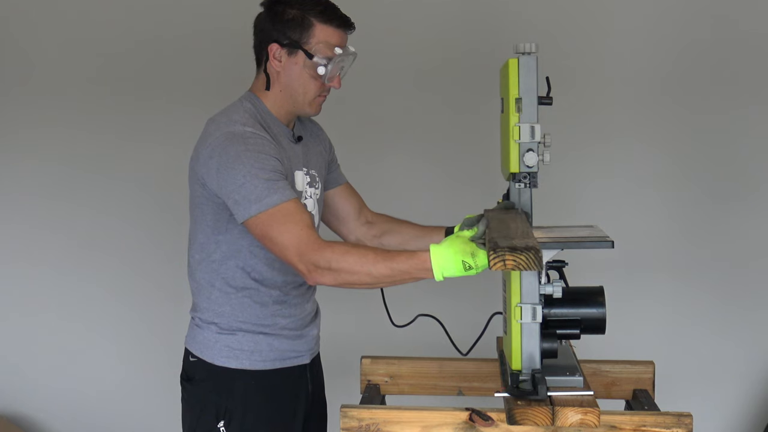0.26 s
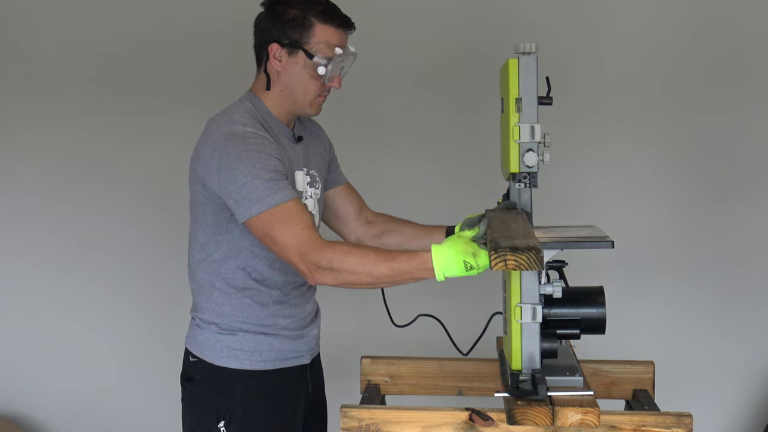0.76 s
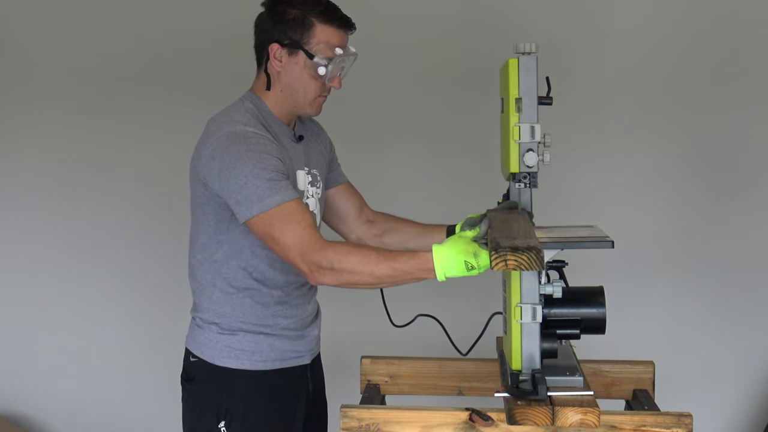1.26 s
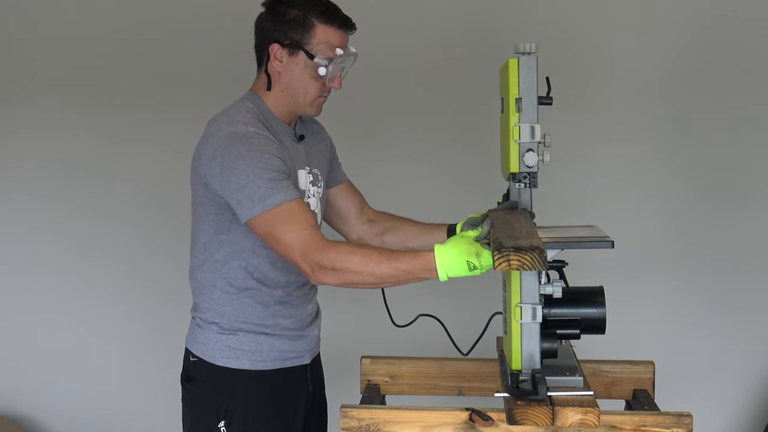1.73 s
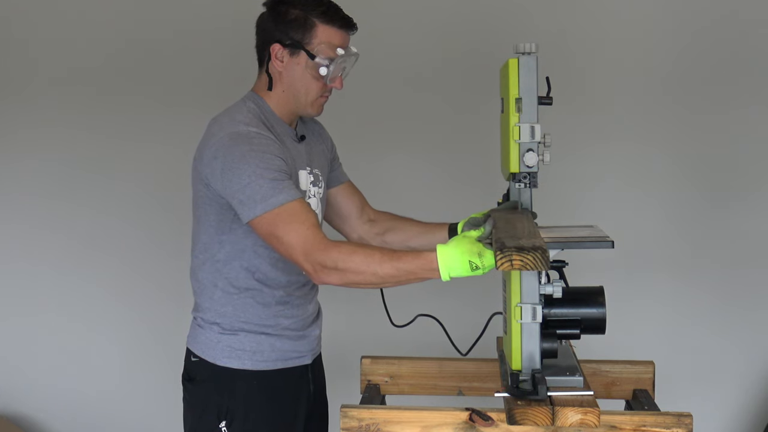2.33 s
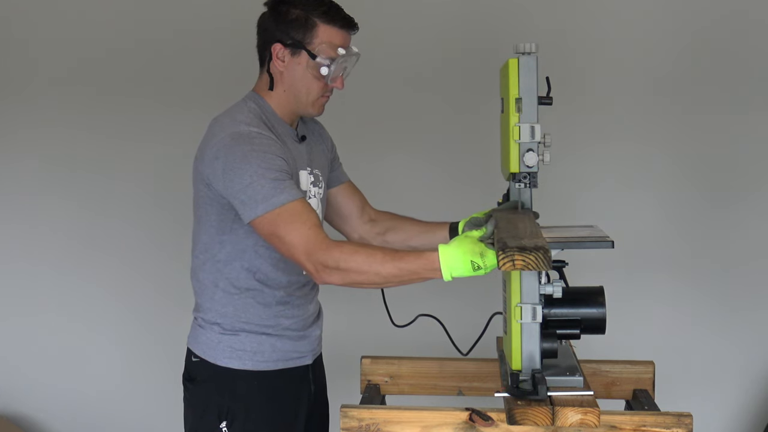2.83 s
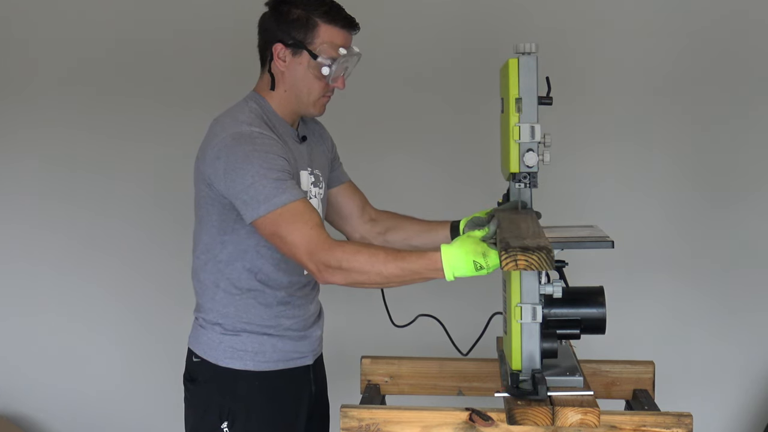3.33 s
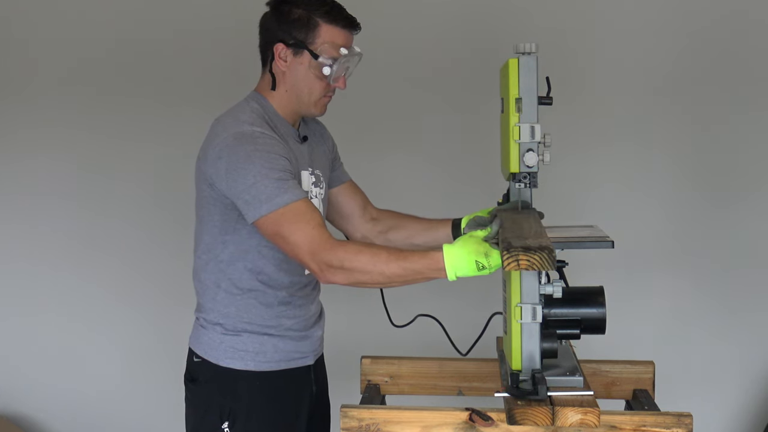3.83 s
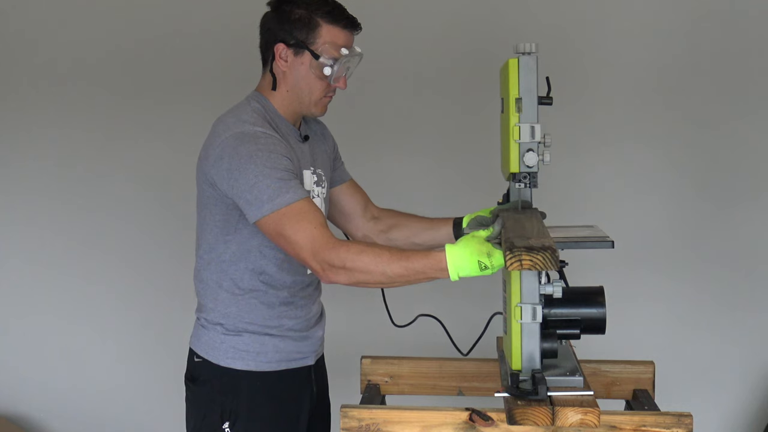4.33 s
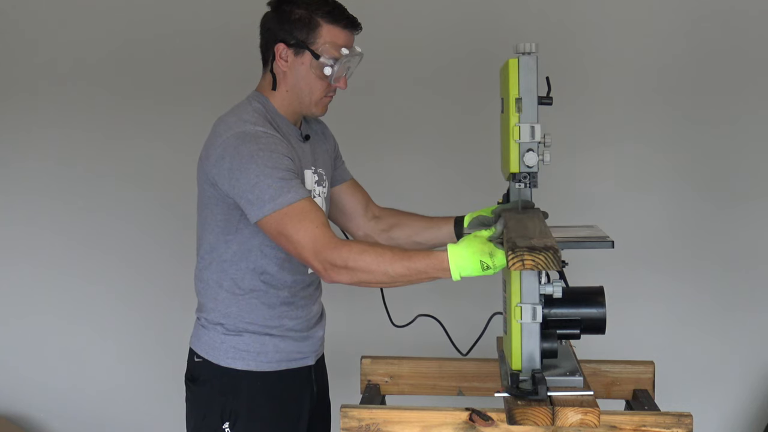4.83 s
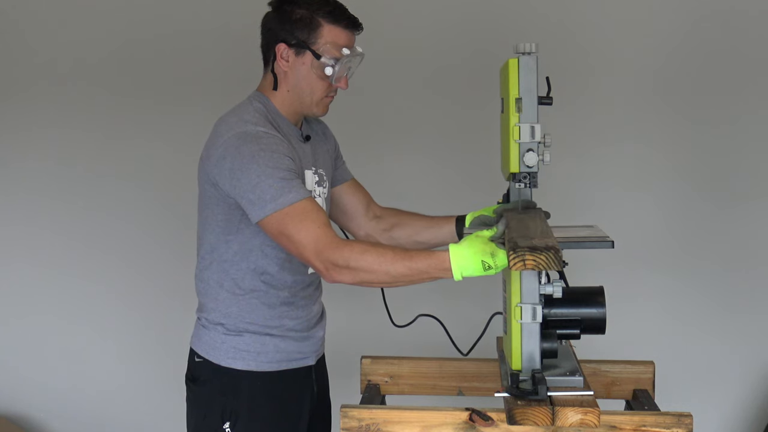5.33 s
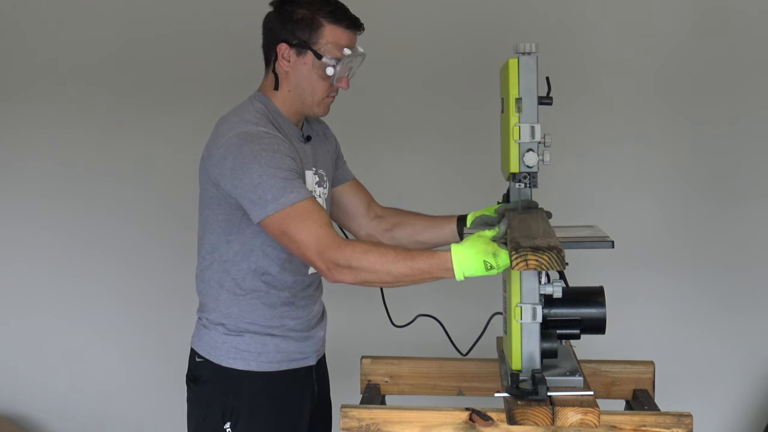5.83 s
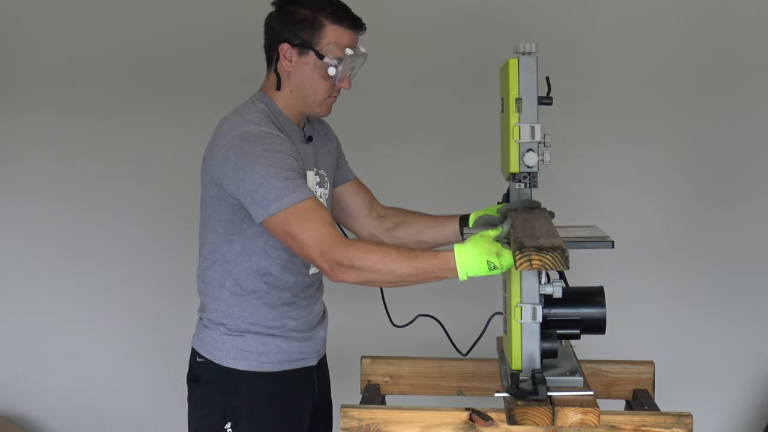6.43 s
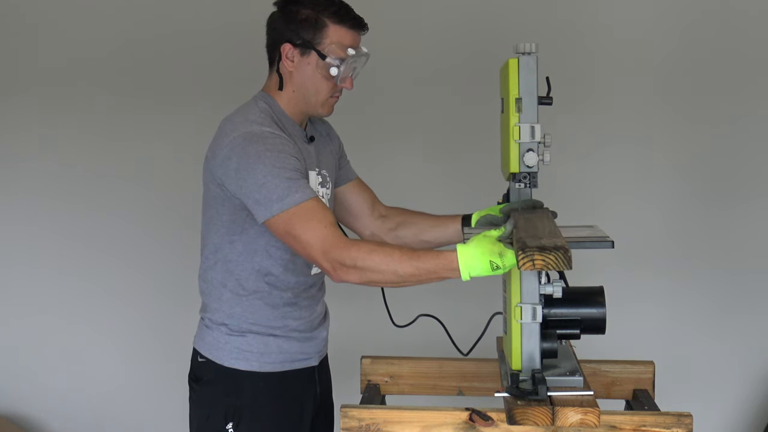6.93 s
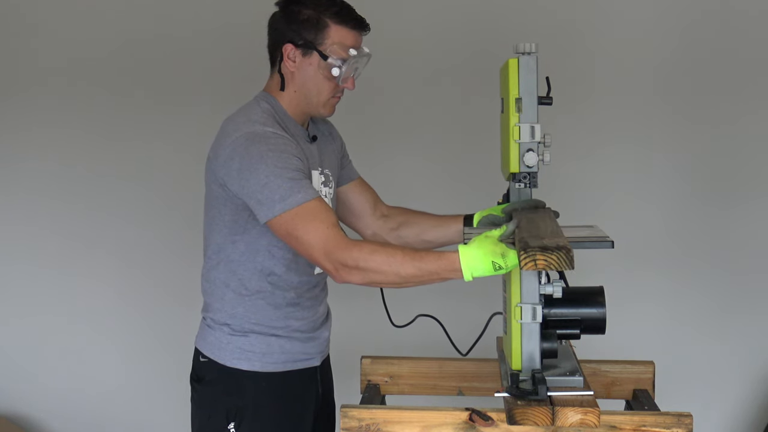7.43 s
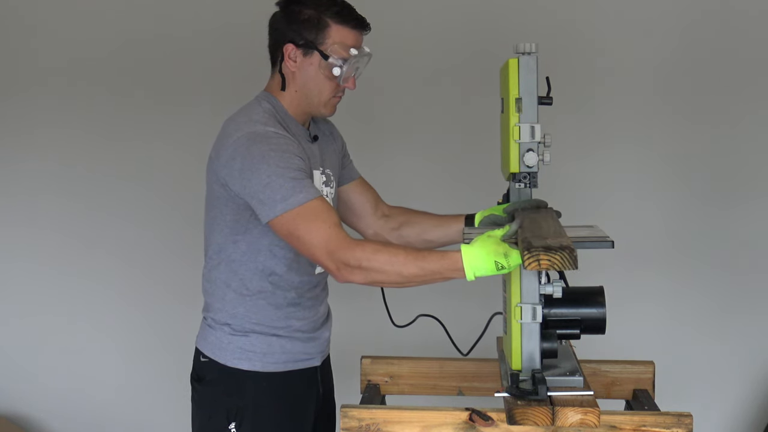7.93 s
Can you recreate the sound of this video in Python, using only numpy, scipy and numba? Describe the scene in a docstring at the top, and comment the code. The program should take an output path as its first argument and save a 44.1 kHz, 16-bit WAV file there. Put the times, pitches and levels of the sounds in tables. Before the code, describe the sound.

Close, harsh band saw noise in a workshop: steady machine hum, fast tooth buzz and grainy wood rasp. Sharp metallic chirps crowd the first two seconds, then thin out as the cut calms. A thin whistle and faint bearing whine sit on top. Later, woody honking resonances flutter with the wheel. The saw is still cutting at the end; the small chest microphone hears a slight room reflection.

```python
"""A small band saw cuts a board in a workshop, heard by one microphone on the worker's chest.
Tooth sets strike the wood about 960 times a second; strikes and fibre noise drive the rasp and the ringing
board, blade, guides and table, each louder or softer as the feed and the free blade length change.
Wheels and frame hum at multiples of the wheel speed. Short squeals, a tooth whistle and a thin bearing
whine lie on top, and a short room tail follows the blade."""
import sys
import numpy as np
from scipy import signal
from scipy.fft import rfft, irfft, next_fast_len
from scipy.io import wavfile
from scipy.ndimage import uniform_filter1d
from numba import njit

SR = 44100
rng = np.random.default_rng(int(sys.argv[2]) if len(sys.argv) > 2 else 0)


def volts_from_db(level):
    """Convert decibel levels to linear amplitude ratios."""
    exponent = np.asarray(level, float) / 20
    return 10 ** exponent


def log_audio(samples):
    """Write samples as a 16-bit WAV file to the path given in sys.argv[1]."""
    # one column per channel
    frames = np.atleast_2d(samples).T
    # limit to full scale, then quantise
    limited = np.clip(frames, -1, 1)
    pcm = np.round(limited * 32767).astype(np.int16)
    wavfile.write(sys.argv[1], SR, pcm)


N = 360297
TIME = np.arange(N) / SR


def unit(x):
    """Scale to rms 1."""
    return x / np.sqrt(np.mean(x ** 2))


def curves(table):
    """Columns of a table after its first, start_s, drawn as straight lines with one value a sample."""
    start_s, *columns = np.transpose(table)
    return [np.interp(TIME, start_s, column) for column in columns]


def walk(rate_hz):
    """Random levels held 1 / rate_hz seconds and slewed twice; rms 1."""
    hold = int(SR * 1 / rate_hz)
    steps = np.repeat(rng.standard_normal(N // hold + 1), hold)
    return unit(uniform_filter1d(uniform_filter1d(steps, hold), hold)[:N])


def ring(x, modes):
    """Sum of resonances, each a peak filter applied twice for steeper sides."""
    out = 0
    for pitch_hz, width_hz, level_db in modes:
        peak = np.concatenate(signal.iirpeak(pitch_hz, pitch_hz / width_hz, SR))
        out = out + volts_from_db(level_db) * signal.sosfilt([peak, peak], x)
    return out


def colour(x, spectrum):
    """Shape x by a spectrum of (pitch_hz, level_db) points, joined along log frequency."""
    pitch_hz, level_db = np.transpose(spectrum)
    size = next_fast_len(N)
    bins_hz = np.fft.rfftfreq(size, 1 / SR) + 1  # the 1 keeps the logarithm finite
    gain = volts_from_db(np.interp(np.log(bins_hz), np.log(pitch_hz), level_db))
    return irfft(rfft(x, size) * gain, size)[:N]


@njit
def sliding(x, pitch_hz, width_hz):
    """State-variable band-pass whose centre moves, gain 1 at the centre."""
    y, band, low = np.empty(len(x)), 0., 0.
    for i in range(len(x)):
        g, k = np.tan(np.pi * pitch_hz[i] / SR), width_hz / pitch_hz[i]
        v = (band + g * (x[i] - low)) / (1 + g * (g + k))
        band, low, y[i] = 2 * v - band, low + 2 * g * v, k * v
    return y


LOOP_SETS = 119  # tooth sets around the blade


def strikes(sets, jitter=0.048, wear_db=4.5, scatter_db=2.0):
    """One click a tooth set; worn teeth come round each blade loop, the grain adds chance."""
    k = np.arange(1, int(sets[-1]))
    worn = rng.standard_normal((LOOP_SETS, 2))[k % LOOP_SETS]
    grain = rng.standard_normal((N // 40, 2))[k]
    # jitter is in tooth-set spacings
    at = np.interp(k + jitter * (worn[:, 0] + grain[:, 0]), sets, np.arange(N))
    # a windowed sinc places each click between samples
    place = at.astype(int) + np.arange(-7, 9)[:, None]
    click = np.sinc(place - at) * np.cos(np.pi * (place - at) / 16) ** 2
    size = volts_from_db(wear_db * worn[:, 1] + scatter_db * grain[:, 1])
    clicks = np.bincount(np.clip(place, 0, N - 1).ravel(), (click * size).ravel(), N)
    return unit(clicks - uniform_filter1d(clicks, 200))  # takes the slow drift out


# Shared level of the rasp and most ringing parts, sinking as the feed eases and rising with each
# new push: start_s, level_db
CUT_LEVEL = [(0, 10.5), (.1, 2.5), (.16, 6.5), (.5, 1), (.6, 4.5), (1.1, 3), (1.46, 0), (1.5, 4), (1.7, 3),
             (1.76, 0.5), (2.2, 1), (2.4, 0), (3.05, -0.5), (3.3, -1), (4.2, -3), (4.3, -1), (4.45, 2),
             (4.75, -0.5), (5.2, 1.5), (5.8, -1.5), (6.9, -1), (7.2, -3), (7.7, -.5), (8.17, -2)]
# How freely each part rings, added to the shared level: start_s, level_db
BOARD_RING = [(0, -7), (.2, 1), (2.5, -1), (3.6, 1.5), (4.2, -3.5), (5.6, -2.5), (6.1, 2), (6.3, 4.5),
              (6.48, 5), (6.6, 1.5), (6.75, 1.5), (6.85, 4.5), (7.08, 4.5), (7.25, 4), (8.17, -2)]
BOARD_UPPER_RING = [(0, -2.5), (2.5, -1.5), (3.5, -4), (5.4, -4), (5.8, 7), (6.15, 11), (6.4, 5), (6.55, 1),
                    (7.1, 9), (7.6, 1), (8.17, 0)]
BLADE_LOW_RING = [(0, 1.5), (.6, 3), (1.2, -1), (1.7, 2.5), (2.4, 3), (3.4, 3.5), (4.3, 0.5), (5, -1),
                  (5.8, -0.5), (8.17, 1.5)]
BLADE_HIGH_RING = [(0, -2), (.2, 2), (.45, 2.5), (.6, 11), (.85, 9.5), (.9, 4), (.95, 10.5), (1.06, 7.5),
                   (1.12, 2), (1.45, -0.5), (1.9, 0), (2.15, 7), (2.55, -2), (3.1, 2), (4.4, -2.5),
                   (5.4, 2), (5.9, -3), (8.17, -10)]
BLADE_FLANKS_RING = [(0, 7), (.5, -2), (.6, 7), (1.05, 7), (1.4, 2), (2.15, 5), (2.6, -2), (4.2, -6),
                     (5.5, 2), (6.3, 1.5), (7.1, 1), (7.6, -0.5), (8.17, -6)]
GUIDE_RING = [(0, -7), (.9, -8), (1.08, 7), (1.4, -6), (2.3, 0), (3.4, -1.5), (4.1, 0), (4.3, 3.5),
              (4.9, -0.5), (5.3, 2.5), (5.9, -0.5), (6.6, 0.5), (7.2, -2), (7.55, 2.5), (7.75, 2),
              (7.9, -5), (8.17, 2)]
WHISPER_RING = [(0, -10), (2, 1), (4, 1), (4.3, 5), (4.9, 8), (5.2, 6), (5.6, 1), (7.4, 1), (7.75, 4),
                (8.17, -1)]
FIZZ_RING = [(0, 11), (.1, 4), (.17, 16.5), (.3, 6.5), (.9, 0), (1.25, -10), (1.45, -8), (1.5, 7),
             (1.72, 8.5), (1.78, 0), (4.2, -4), (4.4, 0), (8.17, -13)]


def levels():
    """Levels in dB of the rasp and most ringing parts: a shared curve plus each part's own ringing or drift."""
    shared = curves(CUT_LEVEL)[0]
    table_fade_db = 1.46 * TIME  # the table fades as the cut deepens
    table_entry_db = 4 * np.exp(-TIME / 0.53)  # and is loud while the blade enters
    return dict(rasp=shared - 42 + 0.2 * TIME,  # rises 0.2 dB a second against the shared level
                board=shared - 45 + curves(BOARD_RING)[0],
                upper=shared - 53 + curves(BOARD_UPPER_RING)[0],
                low=shared - 45.5 + curves(BLADE_LOW_RING)[0],
                high=shared - 48 + curves(BLADE_HIGH_RING)[0],
                flanks=shared - 52.5 + curves(BLADE_FLANKS_RING)[0],
                guide=shared - 48.5 + curves(GUIDE_RING)[0],
                whisper=shared - 70.5 + curves(WHISPER_RING)[0],
                table=shared - 47.5 - table_fade_db + table_entry_db,
                fizz=shared - 65.5 + curves(FIZZ_RING)[0])


MOTOR_THROB_HZ = 56.26
# Tooth rate: start_s, tooth_sets_per_s
TEETH = [(0, 965), (1.5, 962.5), (3, 961), (4, 959.5), (5.5, 959.5), (8.17, 957)]
# Tooth strikes over fibre noise, before each part takes its share: start_s, level_db
EVENNESS = [(0, 1), (2, 3), (4, 2), (5.6, 0), (6, -6), (8.17, -5)]
# Fifth multiple of the tooth rate: start_s, level_db
WHISTLE = [(0, -60), (2.2, -58), (2.8, -52), (3.6, -48.5), (4.1, -53.5), (4.5, -55), (5.5, -60),
           (8.17, -66)]
# Free end of the board: start_s, pitch_hz, level_db
FREE_END = [(0, 855, -46), (3.7, 850, -48), (4.2, 815, -50), (4.4, 763, -43), (5.3, 797, -44.5),
            (5.8, 787, -49), (6.1, 847, -47), (6.4, 810, -44), (6.6, 850, -53), (6.9, 830, -43),
            (7.3, 854, -49.5), (8.17, 836, -45)]
# Relative spectrum of the rasp: pitch_hz, level_db (per Hz)
RASP = [(40, -58), (100, -33.5), (200, -25.5), (320, -15.5), (1000, -14), (1500, -10), (2150, -14),
        (2620, -13), (2800, -15.5), (4300, -14), (5250, -16.5), (6200, -16), (7900, -29.5), (9000, -24.5),
        (12000, -29), (13500, -43), (15600, -42)]
# Resonances, levels relative within each part: pitch_hz, width_hz (of one filter pass), level_db
FRAME = [(490, 60, 0), (1340, 90, -4), (1440, 50, -1), (2310, 90, -3), (3225, 80, -5), (3460, 140, -1),
         (5650, 240, 5), (5810, 220, 3), (6185, 110, -3), (6745, 170, 2), (7330, 200, 1), (10520, 240, -1)]
BOARD = [(740, 35, -9), (770, 45, -13), (806, 35, -10), (848, 40, 0), (875, 38, 1)]
BOARD_UPPER = [(930, 40, -9), (968, 32, 0), (1020, 45, -7)]
BLADE_FLANKS = [(4650, 80, 1), (4975, 105, 2)]
WHISPER = [(14380, 330, 0), (15270, 300, -4)]
BLADE_LOW = [(1620, 150, -8), (1742, 90, -3), (1840, 110, -6), (1922, 62, 1), (1990, 80, -7),
             (2070, 45, -12)]
GUIDE = [(3843, 55, 0), (3900, 100, -5), (3995, 70, -7), (4090, 120, -14)]
TABLE = [(4250, 60, -5), (4325, 70, 0), (4382, 35, 2), (4505, 110, -5)]
BLADE_HIGH = [(4700, 80, -8), (4772, 42, 3), (4820, 55, -2), (4880, 60, -8)]
FIZZ = [(11020, 100, -7), (11320, 200, -9), (11630, 200, 0), (11980, 220, -1)]


def cut(turns, level):
    """Strikes and fibre noise drive each ringing part; wheel, blade loop and motor throb pulse the blade."""
    # the blade stretches and slips, so the tooth rate wavers
    sets = np.cumsum(curves(TEETH)[0] + 1.5 * walk(25)) / SR
    clicks = volts_from_db(curves(EVENNESS)[0]) * strikes(sets)
    wheel_db = 0.83 * np.cos(2 * np.pi * turns + 1.26) + 1.1 * np.cos(4 * np.pi * turns + 1.66)
    loop_db = 0.6 * np.cos(2 * np.pi * sets / LOOP_SETS + 3.14)
    motor_db = 1.4 * np.cos(2 * np.pi * MOTOR_THROB_HZ * TIME)
    chance_db = 0.16 * walk(21.82) + 0.6 * walk(9) + 0.68 * walk(70)
    bite_db = wheel_db + loop_db + motor_db + chance_db

    def part(body, level_db, strike_db, chatter_db, follow):
        """One part, with its share of strikes, its own chatter and how far it follows the bite."""
        force = volts_from_db(strike_db) * clicks + rng.standard_normal(N)
        gain = volts_from_db(follow * bite_db + chatter_db * walk(30))
        return volts_from_db(level_db) * unit(body(unit(gain) * force))

    def ringing(modes, *settings):
        """A part made of fixed resonances."""
        return part(lambda x: ring(x, modes), *settings)

    whistle_db = curves(WHISTLE)[0] + 2.5 * walk(40)
    whistle = np.sqrt(2) * volts_from_db(whistle_db) * np.sin(5 * 2 * np.pi * sets)
    # the loosening board shakes more with each wheel turn
    flutter_db = 0.15 * TIME * np.cos(2 * np.pi * turns + 2.5)
    free_hz, free_db = curves(FREE_END)
    # each row: level_db, strike_db, chatter_db, follow
    rasp = part(lambda x: colour(x + ring(x, FRAME), RASP), level["rasp"], -12.0, 0.66, 0.55)
    board = ringing(BOARD, level["board"] + flutter_db, -12, 0.56, 0.5)
    # the free end of the board rings at a pitch set by where the hands hold it
    free_end = part(lambda x: sliding(x, free_hz, 55.0), free_db + flutter_db, -14.5, 2.3, 0.27)
    board_upper = ringing(BOARD_UPPER, level["upper"], -15, 1.0, 0.6)
    blade_flanks = ringing(BLADE_FLANKS, level["flanks"], -14, 0.61, 1.7)
    whisper = ringing(WHISPER, level["whisper"], -16, 1.8, 0.73)
    blade_low = ringing(BLADE_LOW, level["low"], -12.5, 0.52, 2.0)
    guide = ringing(GUIDE, level["guide"], -18.0, 1.0, 1.0)
    table = ringing(TABLE, level["table"], -27, 1.9, 0.68)
    blade_high = ringing(BLADE_HIGH, level["high"], -6, 0.94, 3.3)
    fizz = ringing(FIZZ, level["fizz"], -11, 1.8, 3.2)
    wood = board + free_end + board_upper
    blade = blade_low + blade_high + blade_flanks
    return whistle + rasp + wood + blade + guide + table + whisper + fizz


# Wheel multiples that the frame sounds, relative levels: multiple, level_db
HUM = [(9, -28), (11, -28), (13, -15), (14, -15), (15, -8), (16, -15), (18, -16), (19, -16), (20, -16),
       (21, 0), (22, -15), (23, -9), (24, -17), (25, -14), (26, -23), (28, -13), (29, -10), (31, -19),
       (37, -16), (39, -18), (43, -13)]
# All the hum together: start_s, level_db
HUM_LEVEL = [(0, -40), (.3, -41.5), (1.4, -41.5), (2.2, -44.5), (3.2, -46), (4.1, -48), (4.4, -45),
             (5.3, -43.5), (5.9, -45.5), (6.4, -46.5), (7.3, -48.5), (7.7, -46), (8.17, -47)]


def hum(turns, waver_db=.9, drift_rad=0.14):
    """Wheel and tyre errors repeat each turn; the frame sounds their multiples, each wavering alone."""
    tones = np.zeros(N)
    for multiple, level_db in HUM:
        # multiples under 17 fade against the rest as the cut deepens, 0.5 dB a second
        fade_db = (multiple < 17) * 0.5 * (TIME - TIME.mean())
        gain = volts_from_db(level_db + waver_db * walk(6.1) - fade_db)
        phase = 2 * np.pi * (multiple * turns + rng.random()) + drift_rad * walk(4.6)
        tones += gain * np.sin(phase)
    return volts_from_db(curves(HUM_LEVEL)[0]) * unit(tones)


# Lesser squeals, peak against the part's level: part, pitch_hz, spread_hz, level_db, length_ms
CHANCE_SQUEALS = [("board", 855, 25, 9, 14), ("low", 1915, 20, 9, 8.1), ("guide", 3880, 45, 9, 9.3),
                  ("table", 4390, 70, 9, 8), ("high", 4790, 67, 10, 5.7), ("rasp", 5700, 80, 2, 7.2),
                  ("rasp", 6720, 41, -5, 7.2)]
# How often each row above comes: squeals_per_s
CHANCE_PER_S = [3, .6, 2, 1.2, 2.5, .8, 1]


def chance_squeals(level):
    """Squeals at random moments, rising and falling with their part's level, most peaking well above it."""
    scatter_db, length_spread = 2.5, 0.48  # length_spread is in natural log units
    rows = []
    for (name, pitch_hz, spread_hz, over_db, ms), per_s in zip(CHANCE_SQUEALS, CHANCE_PER_S):
        count = int(per_s * N / SR)
        at = rng.integers(0, N, count)
        pitch, size, length = rng.standard_normal((count, 3)).T
        peak_db = level[name][at] + over_db + scatter_db * size
        rows += zip(at / SR, peak_db, pitch_hz + spread_hz * pitch, ms * np.exp(length_spread * length))
    return rows


# Squeals at set moments, loud and faint: peak_s, level_db, pitch_hz, length_ms
SQUEALS = [(.01, -30, 3990, 17), (0.058, -25, 4620, 7), (.129, -22.5, 4360, 9.1), (.178, -26, 3910, 6.5),
           (.18, -32, 869, 24), (.26, -26, 4940, 4.5), (.296, -24.5, 4770, 7.3), (.347, -25.5, 4270, 6),
           (.421, -28.5, 4850, 20), (.538, -23, 4830, 5), (.8, -28, 4980, 12), (.853, -27, 4990, 10),
           (2.62, -35, 4330, 14), (2.67, -34, 4350, 12), (2.54, -34, 3850, 12), (.733, -24, 4800, 7),
           (.781, -24, 4780, 8), (.885, -29, 846, 19), (1.298, -29, 4820, 6), (2.025, -29, 5750, 7),
           (4.371, -31, 3930, 6.5), (4.386, -34, 875, 29), (4.67, -29, 3900, 8.4), (5.324, -28, 4740, 6.6),
           (5.437, -29.5, 3870, 15), (6.291, -26, 874, 5), (6.445, -27, 832, 8.8), (7.124, -28, 870, 9),
           (7.848, -29, 868, 6.4), (7.59, -37, 6750, 8), (7.195, -42, 4680, 12), (6.935, -29, 858, 17),
           (3.395, -34, 830, 12), (3.3, -33.5, 850, 45), (2.915, -30, 1925, 12), (0.036, -25.5, 5850, 7.1),
           (0.141, -23, 4830, 5.6), (0.16, -23.5, 1930, 8.6), (0.336, -25.5, 1924, 7),
           (0.357, -25, 849, 26), (0.597, -27, 4780, 6), (0.602, -21.5, 1933, 19.3), (0.624, -21, 4800, 14),
           (0.67, -25, 3900, 11.5), (0.823, -20, 4780, 6.7), (0.951, -19, 4800, 4.5),
           (1.002, -26, 4770, 9.0), (1.041, -19.5, 4900, 4.6), (1.18, -28, 4830, 11),
           (1.315, -23.5, 4840, 9.1), (1.42, -25, 847, 7.1), (1.49, -28, 855, 16), (1.552, -25, 4840, 18),
           (1.636, -23, 4755, 15.8), (1.657, -28.5, 1915, 32), (1.666, -26, 848, 17),
           (1.849, -27, 4770, 12), (1.901, -27.5, 4760, 4.6), (2.131, -25, 4730, 7.8),
           (2.169, -27, 4790, 12.1), (2.189, -26, 4750, 13), (2.426, -27, 3880, 11.6),
           (2.973, -26.5, 1925, 19), (2.985, -27, 4820, 20), (3.094, -27.5, 4800, 15),
           (3.124, -26.0, 4750, 7.7), (3.392, -28, 4780, 14), (3.571, -28, 4740, 13),
           (4.262, -30, 3880, 8.7), (4.31, -24.5, 3880, 8.7), (4.892, -27, 808, 10), (6.166, -33, 906, 5.9),
           (6.246, -29, 870, 4.8), (6.281, -25, 887, 10), (6.305, -22, 863, 12), (6.378, -26, 844, 11),
           (6.463, -25.5, 840, 10), (6.641, -25, 885, 8.7), (6.819, -22.5, 870, 11.4),
           (6.89, -30.5, 846, 42), (7.062, -23.5, 877, 24), (7.536, -30.5, 870, 16),
           (7.627, -35, 3910, 6.4)]


def squeals(level, rise=0.48, peaked=0.71, rough_db=1.0):
    """The blade catches and one resonance swells a moment, roughly, dying a little slower than it rose."""
    rows = SQUEALS + chance_squeals(level)
    out, start_turns = np.zeros(N), rng.random(len(rows))
    for (peak_s, level_db, pitch_hz, length_ms), turn in zip(rows, start_turns):
        near = slice(max(int((peak_s - .05) * SR), 0), int((peak_s + .07) * SR))
        t = (TIME[near] - peak_s) * 1000 / length_ms  # in squeal lengths
        swell = np.exp(-np.abs(t / np.where(t < 0, rise, 1 - rise)) ** peaked)
        out[near] += volts_from_db(level_db) * swell * np.sin(2 * np.pi * (pitch_hz * TIME[near] + turn))
    return out * volts_from_db(rough_db * walk(180))


# Guide bearing whine: start_s, pitch_hz, level_db
BEARING = [(0, 2902, -58), (.6, 2897, -57), (1.9, 2894, -54), (2.2, 2893, -53), (2.5, 2888, -63),
           (3.6, 2882, -61), (4.3, 2884, -64), (4.6, 2888, -54), (4.9, 2895, -56), (5.4, 2895, -60),
           (6.1, 2894, -57), (6.4, 2890, -65), (7.2, 2882, -62), (8.17, 2890, -67)]


def bearing():
    """A guide bearing whines thinly while the blade leans on it, pitch and level wavering."""
    pitch_hz, level_db = curves(BEARING)
    pitch_hz = pitch_hz + 2.5 * walk(8)
    gain = np.sqrt(2) * volts_from_db(level_db + 2 * walk(12))
    return gain * np.sin(2 * np.pi * np.cumsum(pitch_hz) / SR)


def room(blade):
    """The workshop answers the blade with a short tail of decaying noise."""
    t60_s, level_db = .25, -12
    lag = TIME[:SR // 2]
    tail = rng.standard_normal(len(lag)) * volts_from_db(-60 * lag / t60_s)
    return volts_from_db(level_db) * signal.fftconvolve(blade, tail / np.sqrt(np.sum(tail ** 2)))[:N]


# Wheel speed: start_s, turns_per_s
WHEELS = [(0, 16.83), (1.5, 16.8), (2, 16.78), (8.17, 16.765)]


def scene():
    """The saw and a short room tail, alike in both channels."""
    turns = np.cumsum(curves(WHEELS)[0]) / SR
    level = levels()
    blade = cut(turns, level) + squeals(level) + bearing()
    return np.tile(hum(turns) + blade + room(blade), (2, 1))


def roll_off(x):
    """The treble ends steeply here."""
    return signal.sosfilt(signal.butter(12, 15700, fs=SR, output="sos"), x)


def record(dry):
    """The small microphone on the chest drops the deep bass, below 60 Hz."""
    bass_cut = signal.butter(2, 60, "high", fs=SR, output="sos")
    mix = signal.sosfilt(bass_cut, dry)
    return roll_off(mix)


dry = scene()
out = record(dry)
log_audio(out)
```